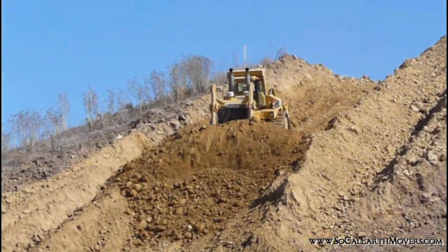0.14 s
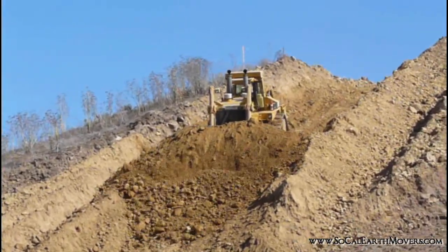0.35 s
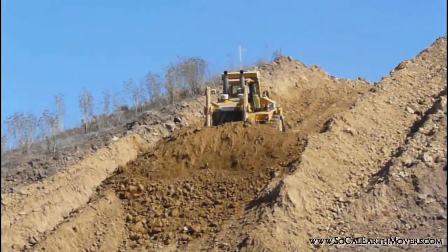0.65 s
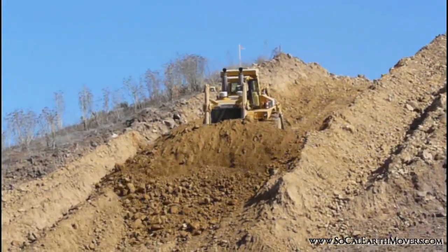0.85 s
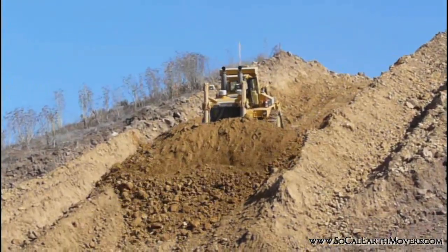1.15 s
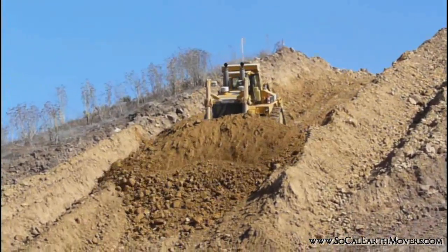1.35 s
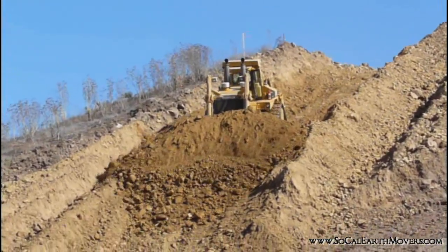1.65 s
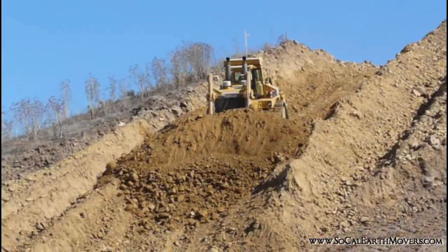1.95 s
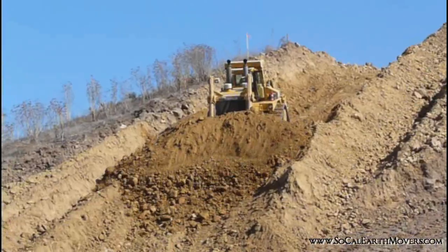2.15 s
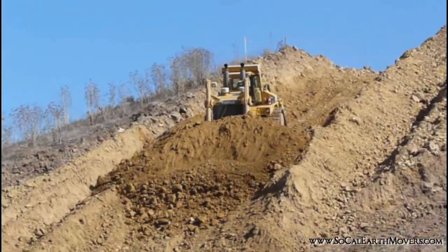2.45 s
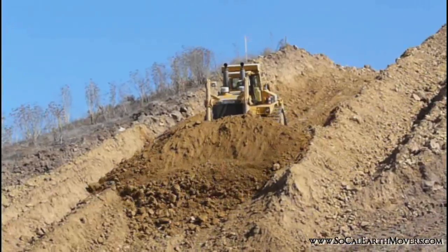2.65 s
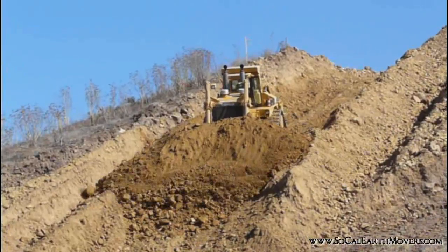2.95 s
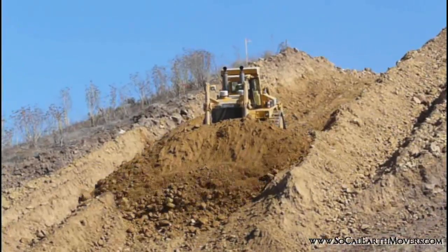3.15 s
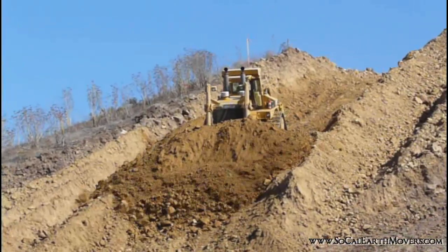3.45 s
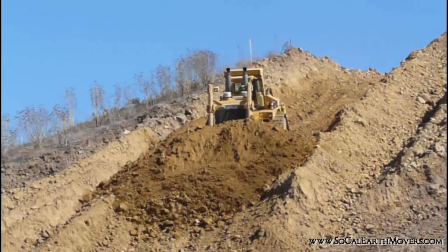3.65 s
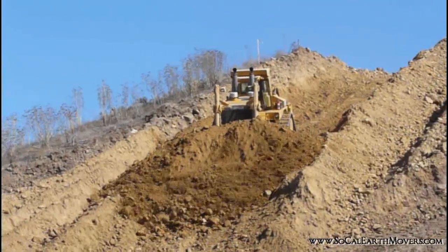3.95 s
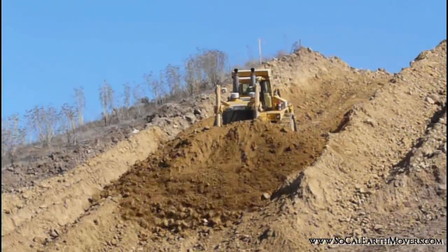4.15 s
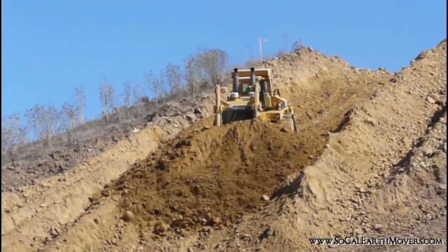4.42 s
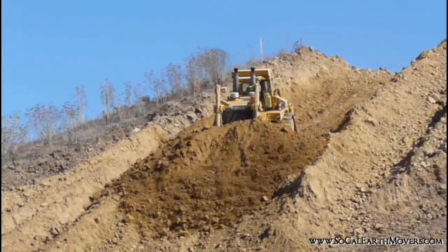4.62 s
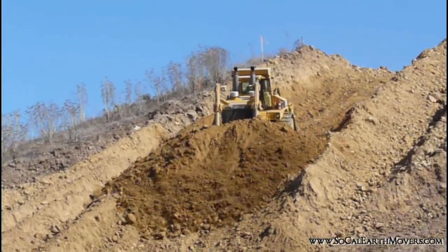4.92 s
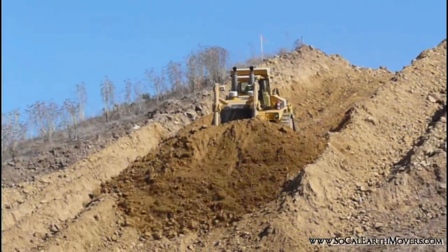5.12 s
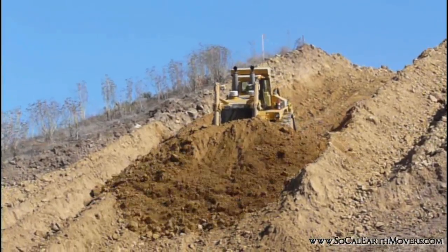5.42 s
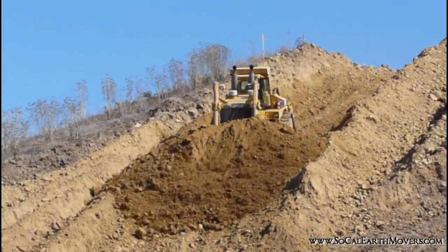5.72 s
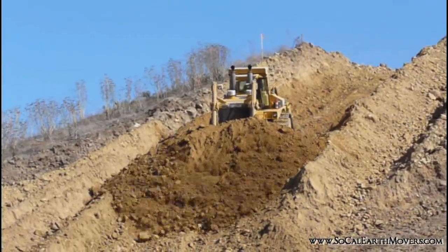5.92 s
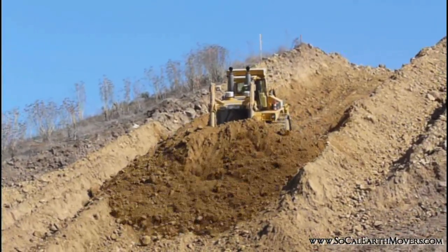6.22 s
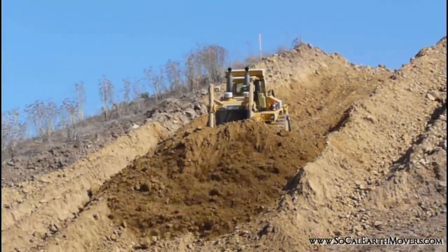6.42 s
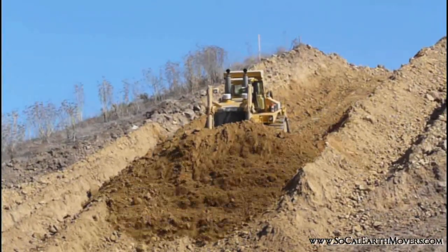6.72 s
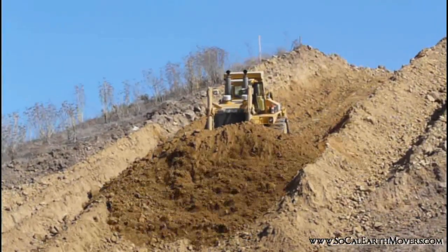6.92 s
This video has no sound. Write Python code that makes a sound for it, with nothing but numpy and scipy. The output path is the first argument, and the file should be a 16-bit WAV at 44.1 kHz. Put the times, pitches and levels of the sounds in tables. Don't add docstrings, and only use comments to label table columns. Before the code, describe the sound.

A steady heavy diesel drone from a distant tracked machine fills an open hillside, its gritty rattle swelling only slightly with load and a mid-pitched gear tone fading in and out. The first second is free of wind; then dense buffeting bursts hit the unprotected microphone, easing into separate low puffs and thumps until the end. Lo-fi mono camera sound, dull with a slightly fizzy edge.

```python
import sys
import numpy as np
from scipy import signal
from scipy.fft import rfft, irfft, next_fast_len
from scipy.io import wavfile
from scipy.ndimage import uniform_filter1d

SR = 44100
rng = np.random.default_rng(int(sys.argv[2]) if len(sys.argv) > 2 else 0)


def store_wav(level_fs):
    pcm = np.round(np.clip(np.atleast_2d(level_fs), -1, 1) * 32767)
    wavfile.write(sys.argv[1], SR, pcm.T.astype(np.int16))


def gain_from_db(level_db):
    decades = np.asarray(level_db, float) / 20
    return 10 ** decades


N = 311787

# time in seconds, peak in dB, pitch in Hz.
STRONG_EDDIES = [(1.331, -7.5, 200), (1.465, -11, 246), (1.513, -11.5, 205), (1.547, -12.5, 208),
                 (1.622, -9.5, 288), (1.711, -6.5, 377), (1.729, -15, 259), (1.774, -13, 225),
                 (1.813, -13, 179), (1.894, -9.5, 194), (2.015, -13, 196), (2.043, -13, 380),
                 (2.078, -9, 225), (2.115, -16, 205), (2.184, -14, 175), (2.204, -13.5, 330),
                 (2.484, -17, 166), (2.894, -12.5, 167), (2.957, -12, 175), (3.479, -12.5, 219),
                 (3.509, -19, 190), (3.958, -15.5, 186), (4.402, -11, 181), (4.472, -14, 226),
                 (4.501, -13, 194), (5.02, -12.5, 266), (5.978, -12.5, 150), (6.248, -15, 175),
                 (6.373, -10.5, 163), (6.746, -12.5, 265)]
BREEZE_DB = -40.0


def rms_one(x):
    return x / np.sqrt(np.mean(x ** 2) + 1e-20)


def in_time(rows):
    time_s, *columns = np.transpose(rows)
    return [np.interp(np.arange(N) / SR, time_s, column) for column in columns]


def at_hz(points, hz):
    point_hz, level_db = np.transpose(points)
    return np.interp(np.log(hz + 1), np.log(point_hz), level_db)


def drift(rate_hz):
    pole = np.exp(-80 * np.pi * rate_hz / SR)
    noise = rng.standard_normal(N // 40 + 2002)
    slow = signal.lfilter([1], [1, -2 * pole, pole * pole], noise)[2000:]
    return np.interp(np.arange(N) / 40, np.arange(len(slow)), rms_one(slow))


def colour(x, gain):
    size = next_fast_len(N)
    hz = np.arange(size // 2 + 1) * SR / size
    return irfft(rfft(x, size) * gain(hz), size)[:N]


def between(low_hz, high_hz):
    def step(hz, edge_hz):
        return 1 / (1 + (edge_hz / (hz + 1)) ** 8)
    return lambda hz: step(hz, low_hz) - step(hz, high_hz)


def tones(turns):
    # multiple of crank rate, rms level in dB.
    orders = [(4, -38), (8, -42), (10, -45), (12, -42), (17.5, -47), (18.8, -47), (24, -49), (28, -52),
              (32, -51), (36, -48), (40, -46), (44, -50), (48, -49), (50, -53), (52, -55), (54, -51),
              (55, -50), (56, -54), (60, -54), (65, -51), (69, -58), (76, -54), (80, -58), (100, -50),
              (100.65, -54), (115, -56)]
    out = 0
    for order, level_db in orders:
        fade_db = (.3 + .5 * np.log(order)) * drift(3)
        phase = 2 * np.pi * (order * turns + rng.random())
        out = out + np.sqrt(2) * gain_from_db(level_db + fade_db) * np.sin(phase)
    return out


def fan():
    # time in seconds, blade rate in Hz, rms level in dB.
    fan_curve = [(0, 88.1, -27.5), (1.3, 87, -27.5), (2.3, 88, -31.5), (3.5, 87.35, -30), (5, 88, -30),
                 (6, 88.2, -29.5), (7.07, 89.9, -32.5)]
    blade_hz, level_db = in_time(fan_curve)
    phase = 2 * np.pi * np.cumsum(blade_hz) / SR
    hum = np.sin(phase) + gain_from_db(-20) * np.sin(4 * phase)
    return np.sqrt(2) * gain_from_db(level_db + .6 * drift(3)) * hum


def body(hz):
    # frequency in Hz, level in dB per Hz.
    roar_spectrum = [(30, -51), (50, -31), (75, -5), (110, -15), (200, -15.5), (300, -14), (480, -16),
                     (640, -11.5), (920, -18), (1270, -16), (2000, -22), (2700, -23), (3300, -20.5),
                     (3990, -21.5)]
    # centre in Hz, width in Hz, gain in dB.
    hood_panels = [(623, 58, 4), (726, 280, 3.5), (1138, 220, 4), (1454, 73, -6), (1740, 590, 6.5),
                   (2390, 250, 3), (2708, 52, -14), (2730, 51, 4), (3518, 480, 5)]
    panels_db = sum(db / (1 + (2 * (hz - centre_hz) / width_hz) ** 2)
                    for centre_hz, width_hz, db in hood_panels)
    return gain_from_db(at_hz(roar_spectrum, hz) + panels_db)


def roar(turns):
    firing = 4 * turns
    strength = gain_from_db(2.4 * rng.standard_normal(int(firing[-1]) + 2))[firing.astype(int)]
    swell = 1 + 0.092 * strength * np.exp(-4.0 * (firing % 1))
    source = rms_one(rng.standard_normal(N) * swell)

    knock_now = rng.random(N) < 500 / SR
    knock_db = 2.4 * np.minimum(rng.exponential(1, N), 4)
    knocks = knock_now * gain_from_db(knock_db) * rng.choice([-1, 1], N)
    bright = rms_one(source + .5 * rms_one(knocks)) * gain_from_db(0.72 * drift(15))

    shares_db = [0.035, 0.027, 0, 0.27, 0.046]
    edges_hz = [1, 450, 900, 1500, 2700, 20000]
    out = 0
    for k, share_db in enumerate(shares_db):
        band = between(edges_hz[k], edges_hz[k + 1])
        part = colour(bright if k > 3 else source, lambda hz: body(hz) * band(hz))
        out = out + part * gain_from_db(share_db + 0.33 * drift(2.8))
    return gain_from_db(-24) * rms_one(out)


def whine(turns):
    # time in seconds, rms level in dB.
    whine_curve = [(0, -36), (.39, -32), (.45, -42), (.7, -35), (1.15, -33), (1.36, -36.5), (1.95, -40.5),
                   (2.4, -33.5), (2.92, -37.5), (3.35, -31), (3.58, -43), (3.7, -30), (4.3, -37),
                   (5.1, -32), (5.44, -42), (5.65, -32), (6.55, -39), (6.85, -32)]
    flutter_db, wobble_rad = 1.5, .4
    level_db, = in_time(whine_curve)
    level = gain_from_db(level_db - 1.5 + flutter_db * drift(6.0))
    return np.sqrt(2) * level * np.sin(2 * np.pi * 20 * turns + wobble_rad * drift(4))


def gusts():
    # start in seconds, hold in seconds, level in dB, brightness above 250 Hz in dB.
    gust_rows = [(1.306, 0.029, -27.5, -9), (1.446, 0.19, -24, -1), (1.734, 0.19, -22, -4.5),
                 (2.005, 0.23, -28, -5), (2.448, 0.073, -26, -6), (2.864, 0.25, -27.5, -2),
                 (3.26, 0.11, -29.5, -1), (3.434, 0.082, -23, -8), (3.933, 0.13, -27.5, -2),
                 (4.17, 0.054, -37, -2), (4.361, 0.13, -28, -0.5), (4.603, 0.055, -31, -5),
                 (4.876, 0.2, -25.5, -9), (5.29, 0.041, -36.5, -16), (5.942, 0.036, -26.5, -10),
                 (6.162, 0.27, -28.5, -16), (6.73, 0.16, -27.5, -3)]
    rise_s, fall_s = 0.032, 0.058
    t = np.arange(N) / SR
    power = bright = 0
    for start_s, hold_s, level_db, bright_db in gust_rows:
        away = np.maximum(start_s - t, 0) / rise_s + np.maximum(t - start_s - hold_s, 0) / fall_s
        gust_power = gain_from_db(2 * level_db) * np.exp(-2 * away ** 2)
        power = power + gust_power
        bright = bright + gust_power * bright_db
    return np.sqrt(power), bright / (power + gain_from_db(2 * BREEZE_DB))


def wind():
    # frequency in Hz, level in dB per Hz.
    wind_spectrum = [(25, -24), (45, 2), (80, 2), (150, 9), (250, -4), (400, -10), (700, -22), (1200, -62)]
    strength, bright_db = gusts()
    breeze = np.clip((np.arange(N) / SR - 1.0) / 0.16, 0, 1)
    lumps = rng.standard_normal(N) * gain_from_db(1.2 * drift(40))
    whole = rms_one(colour(lumps, lambda hz: gain_from_db(at_hz(wind_spectrum, hz))))
    high = colour(whole, between(260, 20000))
    rumble = rms_one(colour(rng.standard_normal(N), between(28, 94)))
    rumble = rumble * gain_from_db(-53.0 + 3.6 * drift(1.6)) * breeze
    gust = gain_from_db(-4.5) * np.hypot(strength, gain_from_db(BREEZE_DB) * breeze)
    return gust * (whole + high * (gain_from_db(bright_db + 11.0) - 1)) + rumble


def small_eddies():
    per_s, pitch_hz, pitch_spread = 40, 205, 0.15
    over_gust_db, spread_db, clear_s = 6.5, 2.5, .016
    chance = rng.standard_normal((6 * per_s, 3))
    time_s = 1.0 + (np.arange(len(chance)) + .3 * chance[:, 0]) / per_s
    strength, _ = gusts()
    gust_db = 20 * np.log10(strength[(time_s * SR).astype(int)] + 1e-9)
    gap_s = np.abs(time_s[:, None] - np.array(STRONG_EDDIES)[:, 0]).min(axis=1)
    level_db = gust_db + over_gust_db + spread_db * np.minimum(chance[:, 1], .7)
    level_db = level_db - 40 * (gap_s < clear_s)
    return np.transpose([time_s, level_db, pitch_hz * np.exp(pitch_spread * chance[:, 2])])


def thumps():
    out, half = np.zeros(N), 600
    t = np.arange(-half, half) / SR
    puff = rms_one(colour(rng.standard_normal(N), between(490, 1200)))
    eddies = [*STRONG_EDDIES, *small_eddies()]
    for (time_s, level_db, hz), chance in zip(eddies, rng.standard_normal(len(eddies))):
        at = round(time_s * SR)
        span = slice(at - half, at + half)
        swing = np.cos(2 * np.pi * (hz * t + .06 + .1 * chance))
        swing = swing + .11 * (hz / 300) ** 2 * puff[span]
        out[span] += gain_from_db(level_db - .5) * swing * np.exp(-(hz * t / .52) ** 2)
    return signal.sosfilt(signal.butter(2, 60, "high", fs=SR, output="sos"), out)


def gain_control():
    # time in seconds, depth in dB.
    duck_rows = [(1.333, 5), (1.71, 5.5), (2.085, 5.5), (2.49, 4.2), (3.51, 1), (4.3, 1.7), (6.38, 1.5),
                 (6.76, 1.5)]
    attack_s, recover_db_per_s = .012, 6.5
    t = np.arange(N) / SR
    ducks_db = [np.where(t > start_s, depth_db - recover_db_per_s * (t - start_s), 0)
                for start_s, depth_db in duck_rows]
    deepest_db = np.max(ducks_db, axis=0).clip(0)
    return gain_from_db(-uniform_filter1d(deepest_db, int(attack_s * SR) + 1))


def scene():
    # time in seconds, rattle level in dB.
    load_curve = [(0, 1.5), (.9, -0.5), (1.3, -0.9), (1.9, -0.5), (2.6, 0), (3.4, -0.3), (4.1, 0.5),
                  (4.5, 0.2), (5.0, -0.5), (5.6, 0.7), (6.0, -0.6), (6.3, 1.8), (7.07, -1.1)]
    crank_hz = 32.63
    turns = np.cumsum(crank_hz + .03 * drift(1)) / SR
    load_db, = in_time(load_curve)
    machine = tones(turns) + fan() + gain_from_db(load_db) * roar(turns)
    return (machine * gain_control() + whine(turns) + wind() + thumps())[None]


def low_pass(x):
    return signal.sosfilt(signal.butter(12, 15760, fs=SR, output="sos"), x)


def record(dry):
    # frequency in Hz, gain in dB.
    image_gains = [(4000, 0), (4800, -9), (5300, -17), (6050, -29), (6800, -47), (7500, -70), (8500, -70),
                   (9200, -54), (9950, -39), (10950, -29), (11950, -23), (13050, -30), (14050, -44),
                   (15000, -62)]
    # frequency in Hz, level in dB per Hz.
    hiss_spectrum = [(5000, -75), (6600, -47), (7050, -58.5), (7600, -52), (8500, -52), (8950, -56),
                     (9400, -54), (14700, -58), (15200, -54.5), (15700, -48)]
    sampled_hz, offset = 8000, -.0255
    size = 441 * 720
    period = size * sampled_hz // SR
    base = rfft(0.82 * np.tanh(dry[0] / 0.77), size)[:period // 2 + 1]
    cycle = np.concatenate([base, base[-2:0:-1].conj()])
    bins = np.arange(size // 2 + 1)
    images = cycle[bins % period] * gain_from_db(at_hz(image_gains, bins * SR / size))
    wide = irfft(images, size)[:N]
    treble = uniform_filter1d(np.abs(colour(wide, between(2940, 4640))), size=24)
    hiss = colour(treble * rng.standard_normal(N), lambda hz: gain_from_db(25.5 + at_hz(hiss_spectrum, hz)))
    return low_pass((wide + hiss)[None] + offset)


dry = scene()
out = record(dry)
store_wav(out)
```